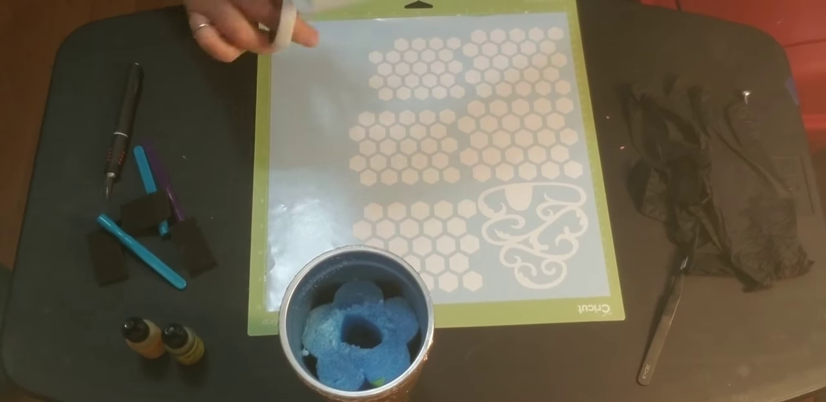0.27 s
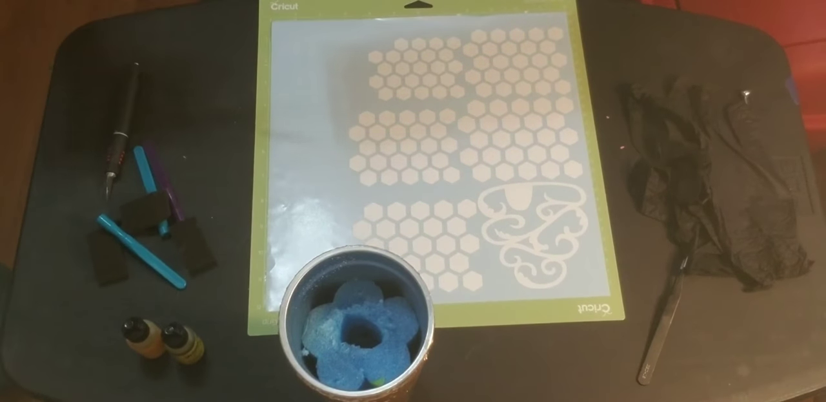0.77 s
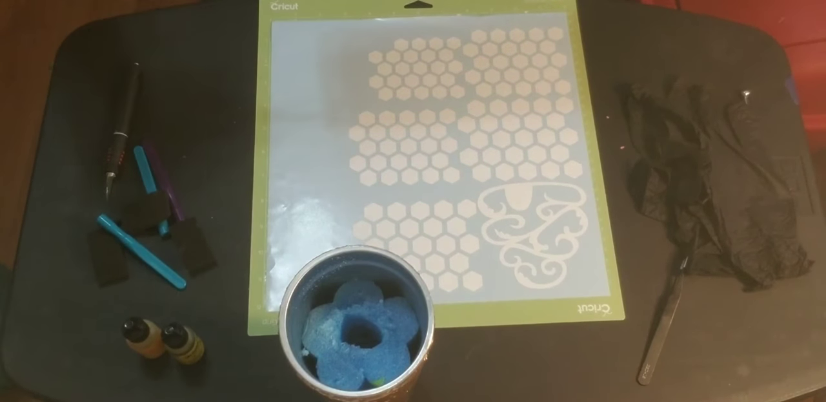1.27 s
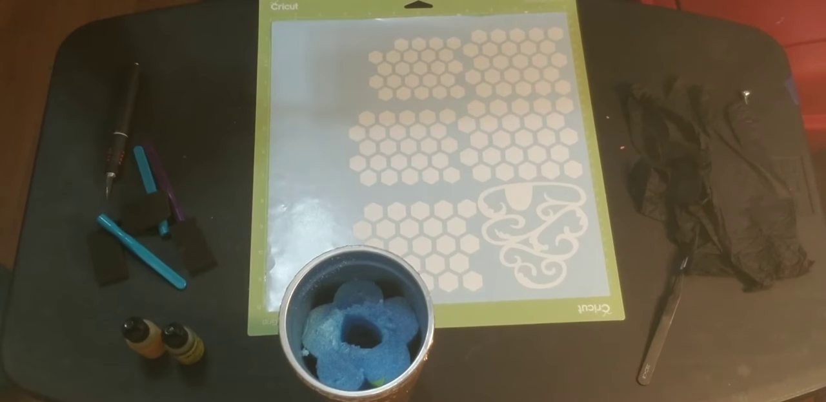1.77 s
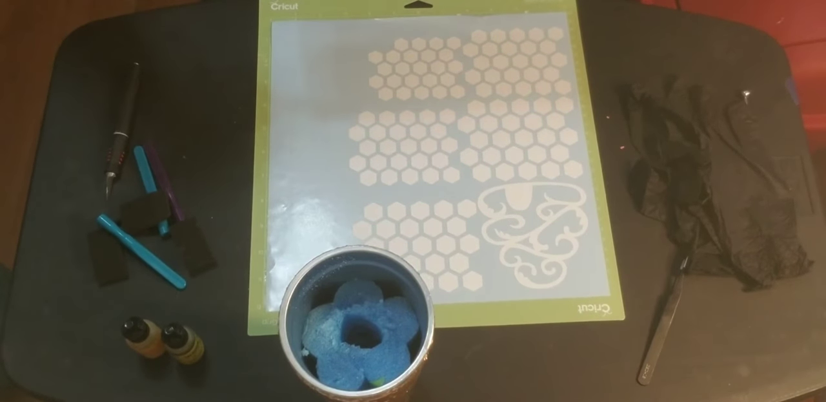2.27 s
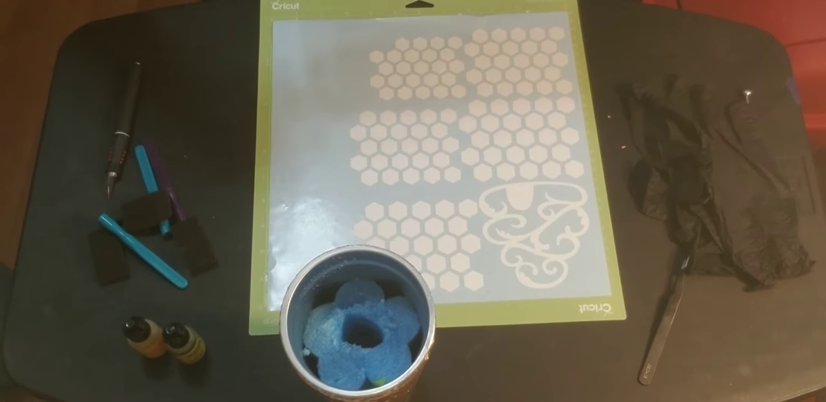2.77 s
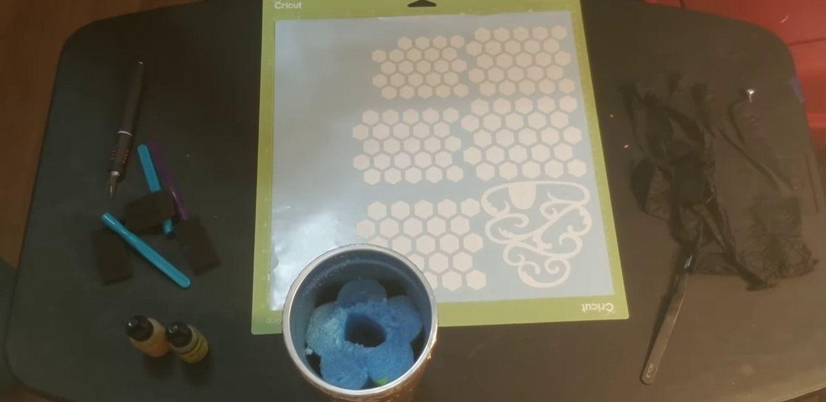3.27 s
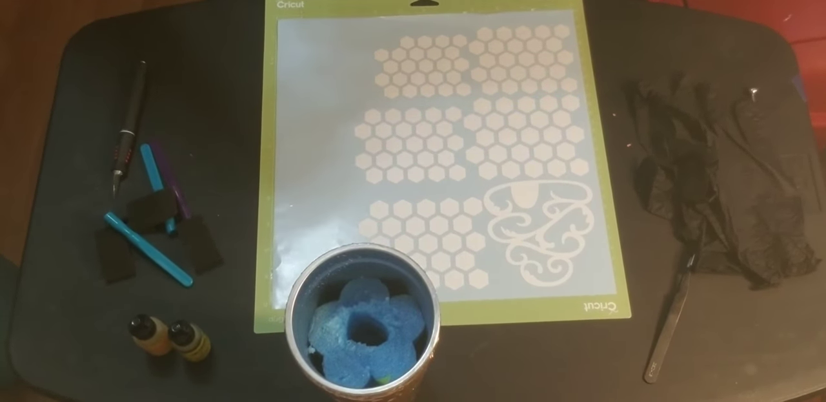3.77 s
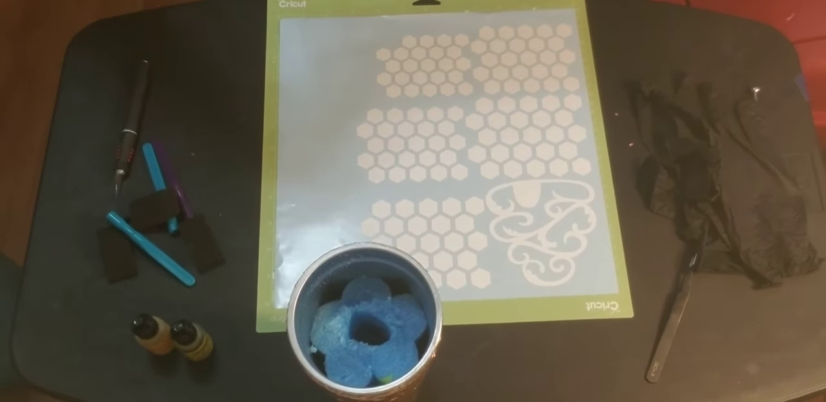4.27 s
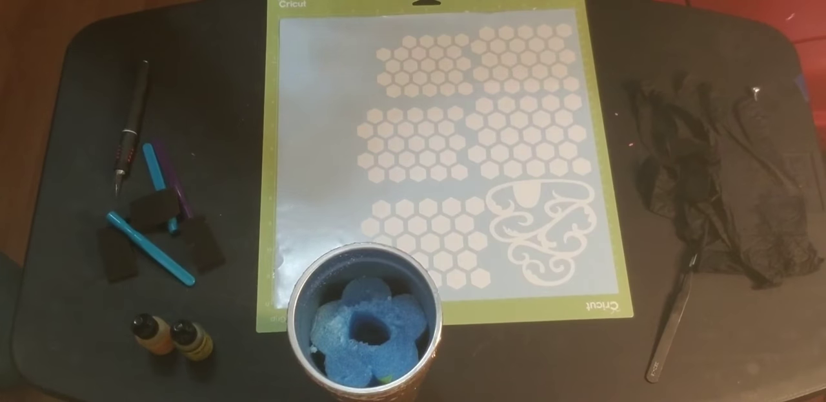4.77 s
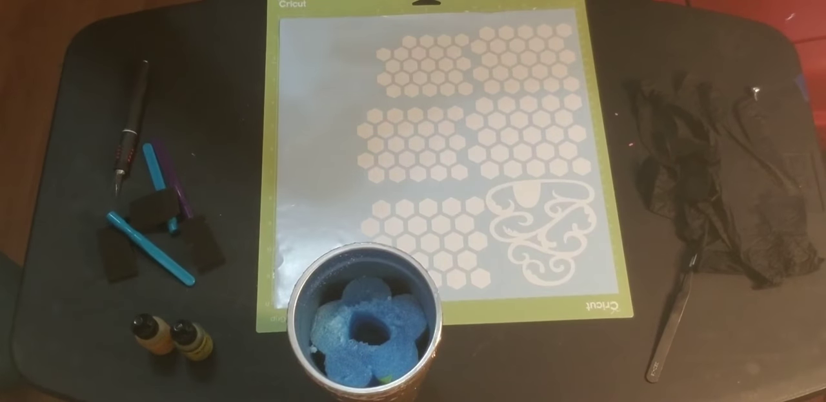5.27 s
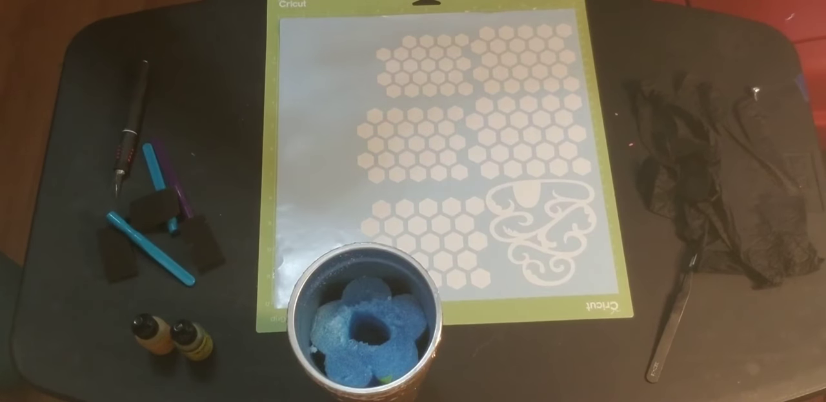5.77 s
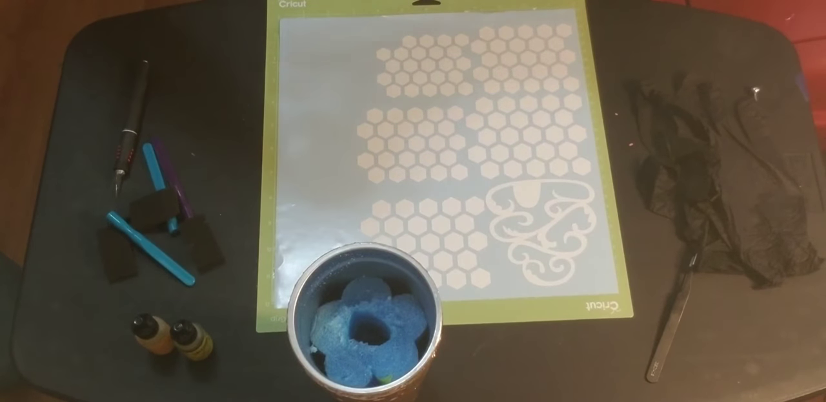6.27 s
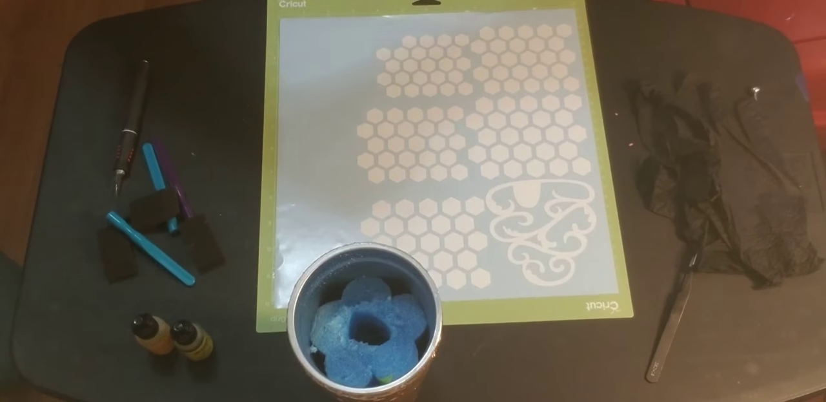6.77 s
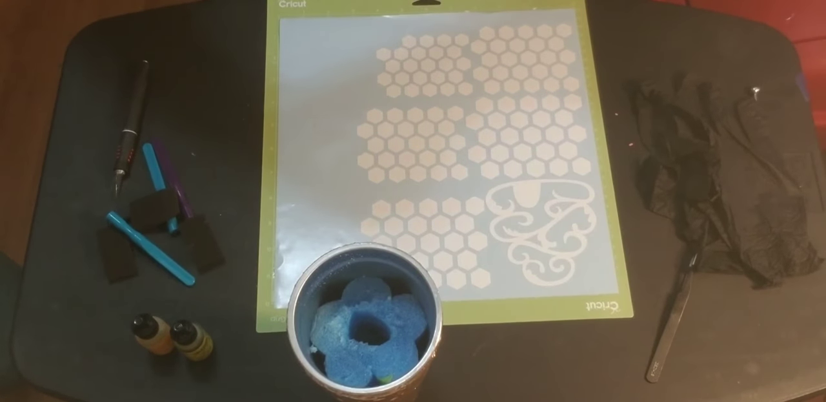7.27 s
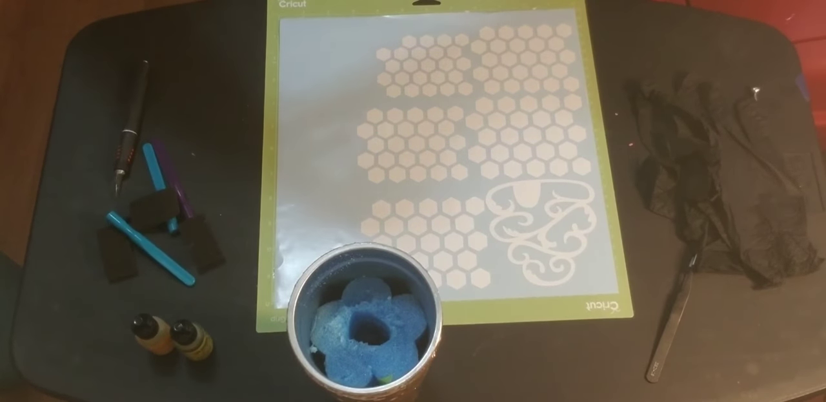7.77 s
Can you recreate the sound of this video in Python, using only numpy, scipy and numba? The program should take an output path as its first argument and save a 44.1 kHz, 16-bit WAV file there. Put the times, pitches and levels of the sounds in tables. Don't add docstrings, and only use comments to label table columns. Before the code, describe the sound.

A stiff plastic sheet is handled at a table in a small, short-echoing room, picked up in stereo from a little way off over faint hum, rumble and hiss. From 0 to 0.5 s there are light rustles with two crisp ticks, then faint crinkles to 0.7 s and a near lull until about 1.8 s, broken only by a weak rustle near 1.4. Soft rubbing grows from 1.8 s, with a strong crunch at 2.7, a swish at 2.9 and crackling at 3.3. Sharp snaps hit at 3.45, 3.57 and 3.85; a crunchy burst follows at 4.45. The densest crackle runs 5.0-5.4 s, with a hard snap at 5.18. Quieter scattered rustles follow, then crisp crunches with a wobbling corner at 6.8 and a burst at 7.2. After a quieter stretch, the brightest, loudest crack lands at 7.73 with a dull table bump, a small crunch at 7.8, then near quiet by 8.

```python
import sys
import numpy as np
from scipy import signal
from scipy.fft import rfft, irfft
from scipy.io import wavfile
from scipy.ndimage import uniform_filter1d, map_coordinates
from numba import njit

SR = 44100
rng = np.random.default_rng(int(sys.argv[2]) if len(sys.argv) > 2 else 0)


def gain_from_decibels(decibels):
    exponent = np.asarray(decibels, float) / 20
    return 10 ** exponent


def digitize_waveform(pressure):
    field = np.atleast_2d(pressure).T
    bounded = np.clip(field, -1, 1)
    quanta = np.round(bounded * 32767).astype(np.int16)
    wavfile.write(sys.argv[1], SR, quanta)


N = 353152

# [t/s, held/s, effort level/dB, belly of the sheet/dB, surface grit/dB]
SWELLS = [(0.66, 0.041, -57, 2, -4), (0.6, .03, -61, -3, -4), (2.885, .04, -50, -10, -8),
          (1.845, .01, -47, -3, -3), (1.4, 0.12, -58, -3.5, -4), (1.795, 0.025, -44, -4, -1),
          (2.034, 0.076, -41, -5, -6.5), (2.24, 0.06, -48.5, 3, -0.5), (2.45, 0.13, -44, 1.5, -9.5),
          (2.94, 0.14, -38, -6, -13), (3.609, 0.06, -50, 4.5, -6), (3.802, 0.0038, -45, -4, -12),
          (4.052, 0.022, -44, -3, -2.5), (4.71, .2, -43, -5, -13.5), (5.175, 0.024, -40, -23, -1.5),
          (5.295, 0.0064, -48.5, -4, 9), (5.37, 0.03, -45.5, -7, -8.5), (6.09, 0.014, -39, -15, -10.5),
          (6.335, 0.0095, -41, 5, -5.5), (6.54, 0.09, -46.5, 0.5, -5), (6.975, 0.0095, -40.5, -4.5, -7.5),
          (4.65, 0.085, -46, -5, -9), (0.0, .05, -48, -3, -7.5), (8.005, .01, -69.5, -11, 16)]
# [t/s, held/s, effort level/dB, belly/dB, grit/dB]
GRABS = [(2.208, 0.012, -48, -12, 1), (0.164, 0.011, -44.5, -18, -14), (0.298, 0.0045, -45, -1, -16.5),
         (0.406, 0.013, -50, 4, -6.5), (1.322, 0.063, -63, 3, -1.5), (7.182, 0.015, -33, -9, -3),
         (2.664, 0.079, -32.5, -4, -8), (3.256, 0.04, -36, 0, -6.5), (3.45, .003, -44, -20, -14),
         (3.57, .003, -43, -7, -16), (3.856, 0.002, -42.5, 0.5, -1), (4.152, 0.18, -43, -20, -9),
         (4.436, .06, -35, -4.5, -5.5), (4.998, .003, -47, -19, -10), (5.1, 0.03, -44, -13, -5.5),
         (5.702, 0.017, -49, -7, -7.5), (5.776, .003, -52, -4, -15), (6.25, 0.045, -49, -2, -4),
         (6.72, .04, -42, 2, -4), (7.152, .024, -38.5, -17, -4), (7.134, .012, -48, -10, -8),
         (2.397, .02, -55, 0, -4), (3.659, .015, -50, -5, 0), (5.137, .03, -43, -15, -4),
         (4.176, .1, -48, -20, 4), (7.393, 0.068, -53.5, 0.5, -3.5), (7.645, .003, -48, 1.5, -11),
         (7.725, 0.0038, -27.5, -1.5, -7), (7.813, 0.0027, -42.5, -6, -5)]
# [t/s, held/s, effort level/dB, belly/dB, grit/dB]
SETTLES = [(0.09, 0.11, -57.5, -5, 0), (0.2, 0.32, -57, -1.5, -7), (1.55, 0.017, -69.5, 29, 6),
           (5.575, 0.0087, -63, 6, -7), (6.47, 0.056, -52.5, -1, -4.5), (3.13, 0.018, -49, 4.5, -17),
           (3.49, 0.028, -56, -8, -14), (3.66, 0.017, -55, -1, 1.5), (3.9, .09, -52, -20, -4.5),
           (4.1, 0.063, -47.5, -5, -19), (5.02, .07, -63, -15, -30), (5.23, .02, -41, -15, -13.5),
           (5.42, 0.0091, -56, -2, -11.5), (5.55, 0.027, -69, 2, -6), (5.86, .01, -54.5, -10, -10.5),
           (5.92, 0.19, -48.5, 2, -7.5), (6.19, 0.063, -56, 1.5, -8), (6.79, 0.015, -47, -17, -11),
           (7.25, .02, -49.5, -16, -14), (7.5, 0.016, -60, -10, -10), (7.87, 0.023, -56, -15, -11),
           (4.36, .02, -47, -8, -6), (1.28, .03, -72, -5, -8), (.75, .01, -69, -5, -4),
           (5.6, .03, -66, -8, -3), (1.615, 0.0017, -62, -3, 5)]
# [f/Hz, density/dB per Hz]
SHEET = [(150, -51), (250, -30), (400, -6.5), (522, -18.5), (700, -2), (853, -9.5), (1170, -4), (1350, -19),
         (1470, 3.5), (2620, -2.5), (4920, -4.5), (8180, -13), (11000, -7), (15700, -19)]
# [f/Hz, width/Hz, level/dB]
SHEET_MODES = [(830, 320, -20), (1460, 120, 12), (3310, 49, 27), (3950, 25, -5), (4940, 130, -49)]
# [t/s, half length/s, f/Hz, lift/dB]
PANELS = [(0.056, 0.11, 3020, 4), (0.645, 0.083, 1760, 5), (0.646, .06, 3640, 7), (1.453, 0.29, 642, 8.5),
          (1.458, 0.18, 3720, 9), (1.453, 0.21, 5800, 7.5), (2.177, 0.2, 665, 8), (3.002, 0.092, 2150, 6.5),
          (3.554, 0.02, 740, 22), (3.804, 0.019, 1450, 7.5), (4.015, 0.095, 2170, 12),
          (4.215, 0.087, 2140, 7.5), (4.255, 0.074, 4060, 4), (5.176, 0.015, 3140, 11),
          (5.337, 0.27, 580, 18.5), (5.726, 0.041, 2740, 9), (6.094, 0.071, 3100, 9),
          (6.104, 0.053, 1450, 6), (6.358, 0.017, 480, 4), (6.99, 0.1, 3760, 2.5), (7.124, 0.033, 3280, -3),
          (0.253, .28, 387, 5.5), (5.56, 0.027, 560, 11.5), (3.867, 0.058, 402, 19),
          (6.536, 0.18, 360, 12.5), (7.22, 0.11, 370, 9), (5.358, 0.011, 3400, 12.5),
          (.4, 0.35, 1450, -4.5), (7.35, 0.57, 1450, -12.5), (7.168, 0.036, 3620, 6), (2.54, .07, 1600, 6),
          (2.06, .04, 3200, 5), (2.1, .04, 1500, 0), (2.95, .08, 1500, 3.5), (3.1, .05, 750, 5),
          (2.7, .04, 1600, 4), (3.3, .04, 800, 4), (4.3, .1, 1450, 5), (4.8, .14, 1500, 3),
          (4.73, .04, 800, 5), (4.47, .04, 1500, 5), (1.4, .06, 1150, 6), (5.92, .04, 3300, 7),
          (1.82, .06, 5000, 4), (7.19, .03, 1950, 3), (.315, .02, 2400, 6), (.33, .025, 1050, 6),
          (.85, .12, 1000, 8), (.85, .12, 3500, 6), (6.63, .03, 900, 5)]
# [t/s, half length/s, f/Hz, lift/dB]
SHADES = [(3.0, .14, 4500, -2.5), (4.8, .17, 4500, -2), (2.3, .7, 330, -4), (3.7, .2, 500, 4),
          (6.33, .13, 330, 6), (7.0, .13, 1900, -3), (7.87, .08, 1700, -4), (5.62, .14, 1600, -5),
          (3.52, .08, 6500, 6), (3.87, .04, 4000, 4), (7.5, .12, 450, 4), (4.87, .05, 1200, -3),
          (1.38, .1, 800, 3), (7.25, .04, 1700, -4), (6.65, .04, 1400, 4), (7.7, .15, 14000, -3),
          (6.9, .08, 650, -4), (7.78, .09, 9500, 7), (7.77, .06, 4300, -3), (6.12, .06, 10500, 2),
          (6.35, .04, 11000, 3), (7.21, .05, 10800, 3), (1.42, .15, 2600, -4), (4.28, .08, 4500, -1),
          (3.3, .05, 4500, -2), (0.23, .06, 4500, -3), (5.14, .05, 2200, 3), (7.16, .04, 3200, 3),
          (3.17, .05, 1100, 4), (2.25, .05, 9000, 3), (7.76, .05, 1050, 3), (5.16, .06, 8000, -4),
          (3.96, .05, 10500, 1), (2.88, .04, 7000, 4), (6.85, .06, 7500, -4), (4.3, .1, 6000, 2),
          (6.55, .08, 12000, 3), (5.2, .08, 12000, 3), (3.5, .05, 14000, -6), (3.88, .05, 14000, -6),
          (5.8, .15, 14000, -4)]
# [t/s, peak level/dB, ring f/Hz, brightness/dB, left minus right/dB]
SNAPS = [(0.162, -29, 2260, -10, -2.5), (0.299, -28.5, 2780, -19, 4), (2.126, -40, 1460, -15, -5.5),
         (3.448, -26, 1680, -21, -3), (3.5685, -22.5, 1590, -20, 2), (3.853, -22.5, 2480, -14, 2.5),
         (4.997, -27, 2040, -47, -5.5), (5.179, -17, 1660, -18, 5), (5.779, -37, 960, -34, -8),
         (5.892, -41, 650, -4.5, 3), (5.186, -21, 1380, -17, -2.5), (7.024, -35, 2090, -25, 2),
         (0.407, -47, 3000, -3, 0), (7.275, -38, 2500, -15, 0), (7.7265, -20.5, 2160, -0.5, 4)]
# [t/s, peak level/dB, ring f/Hz, brightness/dB]
CRUNCHES = [(0.401, -34, 1670, -22), (0.313, -36, 2400, -25), (0.423, -40, 1200, -18),
            (0.627, -50, 1700, -20), (0.663, -52, 1700, -19), (0.692, -42.5, 1570, -16),
            (1.619, -52, 4440, -12), (1.845, -38, 1500, -12), (2.211, -43, 2760, -10),
            (3.275, -30, 800, -22), (3.297, -30, 1300, -22), (3.32, -31, 1400, -22),
            (2.427, -39.5, 560, -16), (2.661, -31, 1670, -10), (2.727, -20, 1530, -42),
            (4.447, -23, 1730, -23), (4.491, -23.5, 1490, -16), (4.513, -25, 1870, -18),
            (5.139, -28, 4100, -22), (5.194, -19.5, 746, -25), (5.287, -25.5, 2400, -28),
            (5.304, -28, 630, -24), (5.362, -31, 2330, -9.5), (5.399, -29, 1710, -30),
            (5.575, -50, 700, -40), (5.855, -42, 2320, -27), (5.97, -30, 2200, -21), (6.1, -37, 1470, -8),
            (6.253, -36, 2610, -12), (6.333, -35, 1060, -5), (6.737, -33, 3800, -9.5),
            (6.773, -22.5, 3750, -8.5), (7.16, -32, 2000, -10), (7.189, -23.5, 1930, -6),
            (7.394, -48, 3540, -8.5), (7.642, -44, 900, -35), (7.651, -38, 1990, -12),
            (7.744, -34, 1880, -31), (7.813, -25, 1110, -17), (7.998, -44.5, 1820, -8)]
# [t/s, peak level/dB, f/Hz, ring/s]
WOBBLES = [
    (6.784, -44, 520, .06),
    (6.806, -42, 500, .05),
    (6.843, -50, 460, .05),
    (7.088, -67, 3300, .5),
    (5.779, -46, 1000, .015),
    (5.892, -42, 650, .06),
]
# [t/s, peak level/dB, f/Hz]
BUMPS = [(0.069, -56, 62), (3.627, -47.5, 158), (4.47, -54, 109), (4.851, -54, 123), (5.183, -53, 128),
         (6.33, -58, 60), (6.777, -49, 60), (7.189, -47, 57.5), (7.199, -52.5, 144), (7.733, -45.5, 56.7),
         (7.733, -47, 98), (7.74, -49, 194)]
# [f/Hz, correlation]
ROOM_LIKENESS = [(60, 0.96), (600, 0.43), (1500, 0.022), (4000, 0.014), (15000, 0.018)]
# [f/Hz, T60/s]
ROOM_T60 = [(100, 0.34), (1000, 0.12), (5000, 0.16), (15000, 0.1)]
# [f/Hz, density/dB per Hz]
AIR = [(13, -34), (22, -7), (43, -15), (60, -4), (119, -2.5), (141, -6), (232, -17), (306, -13.5),
       (415, -21.5), (646, -19.5), (742, -21.5), (2250, -31), (15200, -29), (16500, -48)]
# [f/Hz, width/Hz, level/dB]
HUM = [
    (60, 1.5, -77),
    (116.2, 10, -79.5),
]
# [f/Hz, left minus right/dB]
PORTS = [(60, 0), (110, -1.5), (200, -1), (380, -4.5), (700, -1.5), (1290, -2.5), (2380, -3), (4400, -3.5),
         (7000, 0.5), (9500, 3), (12000, 1), (15000, 0)]
# [f/Hz, level/dB]
SIDE_KEPT = [(12500, 0), (14500, -5), (15500, -16)]

SLIPS, SLIPS_PER_SNAP = 120000, 40


def rubbing(cycles=10.6, mode_share=0.06, mode_db=-4.0, spread_s=.00012):
    u = rng.random((SLIPS, 5)).T
    g = rng.standard_normal((SLIPS, 2)).T
    s = u[0] * N / SR
    hz = 300 * (16500 / 300) ** (u[1] ** 0.6076)
    effort_db, belly_db, grit_db = strokes(s)
    mode = (u[2] * len(SHEET_MODES)).astype(int)
    mode_hz, width_hz, peak_db = np.array(SHEET_MODES)[mode].T
    ringing = u[3] < mode_share
    hz = np.where(ringing, mode_hz * (1 + 0.02 * g[0]), hz)
    t60_s = np.where(ringing, 3.1 / np.clip(width_hz, 60, 400), cycles / hz)
    lift_db = panel_db(s, hz, PANELS, octaves=0.19)
    t60_s = t60_s * (1 + 0.22 * np.maximum(lift_db, 0))
    colour_db = on_log(SHEET, hz) + 10 * np.log10(hz / 2000 / t60_s / SR)
    colour_db = colour_db + ringing * (mode_db + 0.039 * peak_db)
    scatter_db = np.minimum(-2.5 * np.log(u[4]), 9) + 3.5 * patches(s, hz)
    db = effort_db + tilt_db(hz, belly_db + 7.3, grit_db + 6.93) + colour_db
    db = db + lift_db + panel_db(s, hz, SHADES, octaves=0.55) + scatter_db
    return s, hz, t60_s, gain_from_decibels(db + 17.2) * np.sign(g[0]), spread_s * g[1], np.ones(SLIPS)


def strokes(s):
    t = np.arange(0, N / SR + .002, .001)
    still_db, grip_s, grip_db_s = -83, .02, 450
    fade_db, loose_belly_db, loose_grit_db = 18.5, -1.5, -4.5
    power, belly, grit = gain_from_decibels(2 * still_db), 0, 0
    kinds = ((SWELLS, 267, 243, 0), (GRABS, 2200, 231, 1), (SETTLES, 300, 116, 0))
    for rows, rise_db_s, fall_db_s, grip in kinds:
        for at, held_s, db, belly_db, grit_db in rows:
            rising = rise_db_s * np.maximum(at - t, 0)
            dying = fall_db_s * np.maximum(t - at - held_s, 0)
            tightening = grip * grip_db_s * np.clip(min(held_s / 2, grip_s) - (t - at), 0, grip_s)
            p = gain_from_decibels(2 * (db - rising - tightening - dying))
            loose = np.minimum(dying / fade_db, 1)
            power = power + p
            belly = belly + p * (belly_db + loose * (loose_belly_db - belly_db))
            grit = grit + p * (grit_db + loose * (loose_grit_db - grit_db))
    curves = 10 * np.log10(power), belly / power, grit / power
    return [np.interp(s, t, c) for c in curves]


def tilt_db(hz, belly_db, grit_db):
    octaves = np.log2(hz / 2000)
    low = np.clip((-octaves - .6) / 0.21, 0, 1)
    high = np.clip((octaves - .8) / 0.53, 0, 1)
    return belly_db * low + grit_db * high


def panel_db(s, hz, rows, octaves):
    lift_db = 0
    for at, half_s, centre_hz, db in rows:
        distance = ((s - at) / half_s) ** 4 + (np.log2(hz / centre_hz) / octaves) ** 2
        lift_db = lift_db + db * np.exp(-distance)
    return lift_db


def patches(s, hz, length_s=.07, octaves=0.2261):
    grid = rng.standard_normal((400, 100))
    return map_coordinates(grid, [s / length_s, np.log2(hz / 200) / octaves], order=1)


def creases():
    flips = snapping(SNAPS, knot_s=.0007, ring_s=.008, ring_db=-3.0, slips_db=-6.0)
    placed = [(*row, 1) for row in CRUNCHES]
    crunches = snapping(placed, knot_s=.005, ring_s=.025, ring_db=-8.0, slips_db=-9.0, cycles=10.)
    return flips, crunches


def snapping(rows, knot_s, ring_s, ring_db, slips_db, cycles=4.6):
    columns = np.transpose(rows)
    s, peak_db, ring_hz, bright_db, pan_db = (np.repeat(c, SLIPS_PER_SNAP) for c in columns)
    u = rng.random((3, len(s)))
    first = np.arange(len(s)) % SLIPS_PER_SNAP == 0
    hz = np.where(first, ring_hz, 800 * (15500 / 800) ** u[0])
    db = peak_db + np.where(first, ring_db, tilt_db(hz, -17.5, bright_db + 18.0) + slips_db)
    late_s = np.where(first, knot_s / 2, -knot_s * np.log(u[1]))
    t60_s = np.where(first, ring_s, cycles / hz)
    return s + late_s, hz, t60_s, gain_from_decibels(db) * np.sign(u[2] - .5), -pan_db * 1.5e-5, gain_from_decibels(pan_db)


def wobbles():
    s, peak_db, hz, t60_s = np.transpose(WOBBLES)
    return s, hz, t60_s, gain_from_decibels(peak_db + 0.5), 0 * s, 1 + 0 * s


@njit
def grains(s, hz, t60, size, lag_s, pan, out):
    y = np.zeros_like(out)
    for g in range(len(s)):
        p = np.exp(2j * np.pi * hz[g] / SR - np.log(1000) / (t60[g] * SR))
        for c in range(2):
            at = (s[g] + (c - .5) * lag_s[g]) * SR
            start = max(int(at) + 1, 0)
            z = p ** (start - at) * size[g] * pan[g] ** (.5 - c)
            for i in range(start, min(start + int(.8 * t60[g] * SR), y.shape[1])):
                y[c, i] += z.imag
                z *= p
    return y


def table_top(sheet):
    hz0, width_hz, db = 203, 120, -14
    return shape(sheet, lambda hz: gain_from_decibels(db) / (1 + ((hz - hz0) / width_hz) ** 4))


def mirror(sheet):
    delay_s, db = (0.00111, 0.001328), -18.5

    def gain(hz):
        delay = np.exp(-2j * np.pi * np.outer(delay_s, hz))
        return gain_from_decibels(db) * delay * (hz > 550) / (1 + (hz / 6000) ** 2)
    return shape(sheet, gain)


def bumps(t60_s=0.079):
    s, peak_db, hz = np.transpose(BUMPS)
    return s, hz, t60_s + 0 * s, gain_from_decibels(peak_db + 1.0), 0 * s, 1 + 0 * s


def room(x, wet_db):
    t = np.arange(SR // 2) / SR
    noise, echo = pair(len(t), ROOM_LIKENESS), 0
    for centre_hz in 62.5 * 2. ** np.arange(9):
        def octave(hz):
            off = np.log2(np.maximum(hz, 1) / centre_hz)
            return np.cos(np.pi / 2 * np.clip(off, -1, 1)) ** 2
        echo = echo + shape(noise, octave) * 1000. ** (-t / on_log(ROOM_T60, centre_hz))
    echo = echo * np.clip(t / 0.002 - .5, 0, 1)
    evenness = uniform_filter1d(np.abs(rfft(echo)) ** 2, size=13, axis=1) ** -.5
    echo = shape(echo, lambda hz: evenness) * (t < .4)
    heard = gain_from_decibels(wet_db) * echo / np.sqrt(np.sum(echo ** 2) / 2) + (t == 0)
    power = np.abs(rfft(heard.mean(0))) ** 2
    correction = uniform_filter1d(power, size=401) / uniform_filter1d(power, size=45)
    cepstrum = irfft(np.log(correction))
    causal = np.exp(rfft(cepstrum * (t < t.mean())))
    return signal.fftconvolve(x, shape(heard, lambda hz: causal), axes=1)[:, :N]


def air():
    likeness = [(60, 0.88), (300, 0.56), (1400, .01), (15000, .01)]  # f/Hz, correlation
    bed = level(shape(pair(N, likeness), lambda hz: gain_from_decibels(on_log(AIR, hz))), -69.5 - 1.5)
    for hum_hz, width_hz, db in HUM:
        hum = shape(pair(N, likeness), lambda hz: 1 / (1 + ((hz - hum_hz) / width_hz) ** 2))
        bed = bed + level(hum, db)
    return bed


def pair(size, likeness):
    mid, side = rng.standard_normal((2, size))
    mid = shape(mid, lambda hz: np.sqrt(1 + np.clip(on_log(likeness, hz), -1, 1)))
    side = shape(side, lambda hz: np.sqrt(1 - np.clip(on_log(likeness, hz), -1, 1)))
    return np.array([mid + side, mid - side]) / np.sqrt(2)


def on_log(table, hz):
    columns = np.array(table).T
    return np.interp(np.log(np.maximum(hz, 1)), np.log(columns[0]), columns[1])


def level(x, db):
    return x * gain_from_decibels(db) / np.sqrt(np.mean(x ** 2))


def shape(x, gain):
    return irfft(rfft(x) * gain(np.fft.rfftfreq(x.shape[-1], 1 / SR)), x.shape[-1])


def butter(x, order, hz, kind):
    return signal.sosfilt(signal.butter(order, hz, kind, fs=SR, output="sos"), x)


def scene():
    empty = np.zeros((2, N))
    slips = rubbing()
    flips, crunches = creases()
    sheet = grains(*map(np.concatenate, zip(slips, crunches, wobbles())), empty)
    sheet = sheet + butter(grains(*flips, empty), 2, 900, "high")
    table = table_top(sheet)
    sheet = butter(sheet, 4, 325, "high")
    knocks = butter(grains(*bumps(), empty), 2, (45, 220), "band")
    dry = sheet + mirror(sheet) + table + knocks
    return gain_from_decibels(0.5) * room(dry, wet_db=-2.0) + air()


def band_limit(x):
    return signal.sosfilt(signal.butter(12, 16820, fs=SR, output="sos"), x)


def record(dry):
    top_hz, edge_hz = 15920, 200
    rounded = .6 * np.tanh(dry / .6)

    def port_gain(hz):
        colour = gain_from_decibels(np.outer([.5, -.5], on_log(PORTS, hz)))
        return colour * np.clip((top_hz - hz) / edge_hz, 0, 1)
    ports = shape(rounded, port_gain)
    mid = ports.mean(0)
    mix = mid + shape(ports - mid, lambda hz: gain_from_decibels(on_log(SIDE_KEPT, hz)))
    return band_limit(mix)


dry = scene()
out = record(dry)
digitize_waveform(out)
```